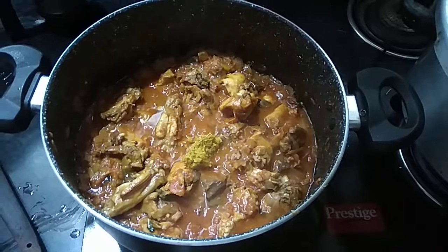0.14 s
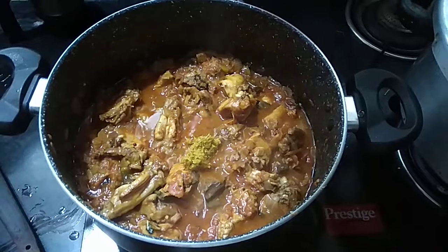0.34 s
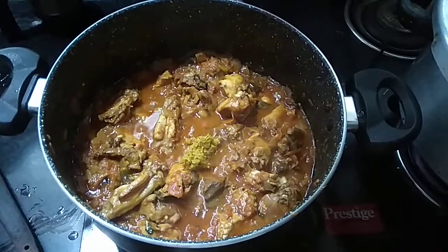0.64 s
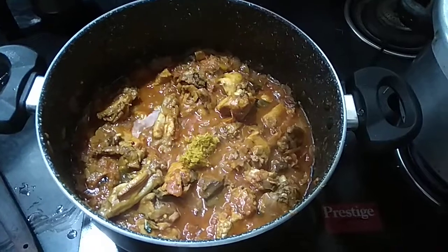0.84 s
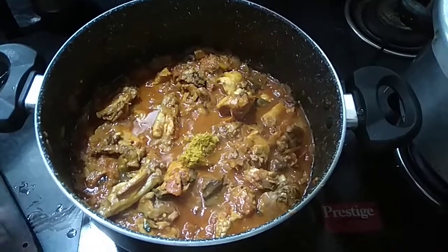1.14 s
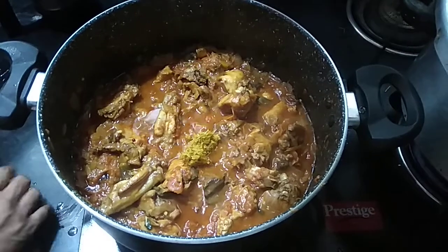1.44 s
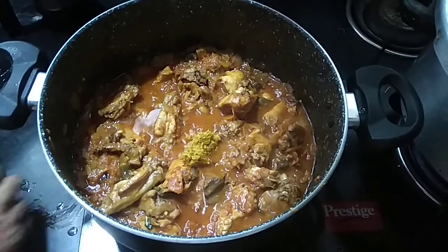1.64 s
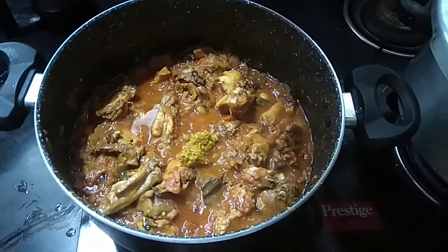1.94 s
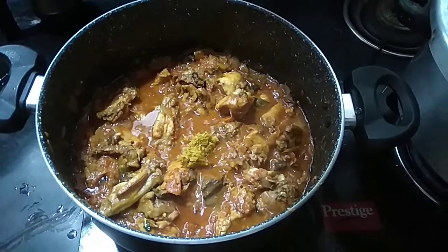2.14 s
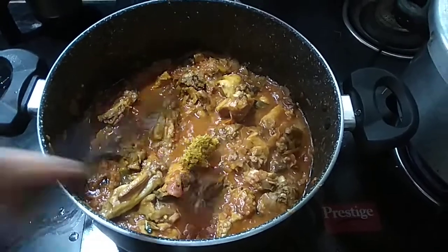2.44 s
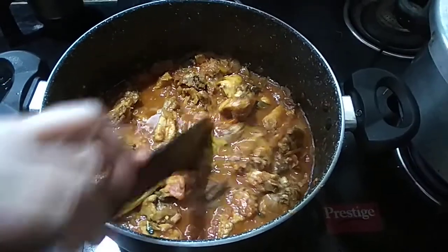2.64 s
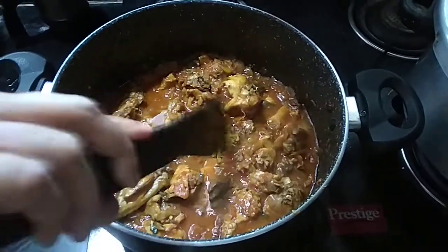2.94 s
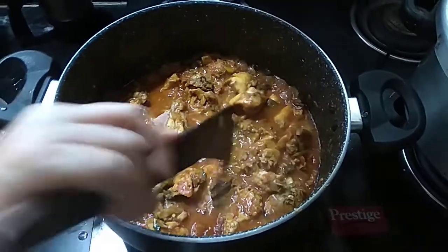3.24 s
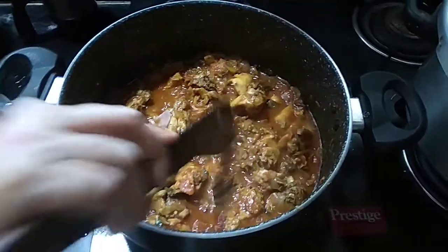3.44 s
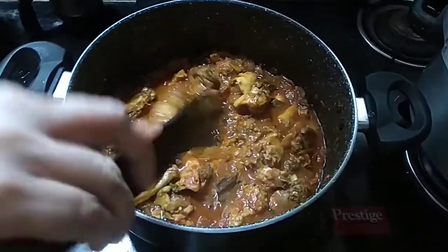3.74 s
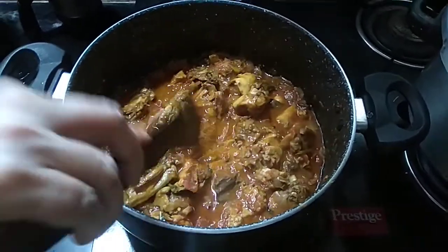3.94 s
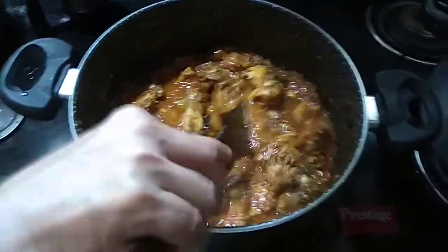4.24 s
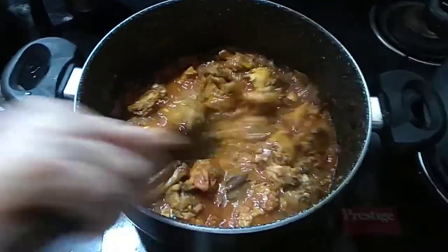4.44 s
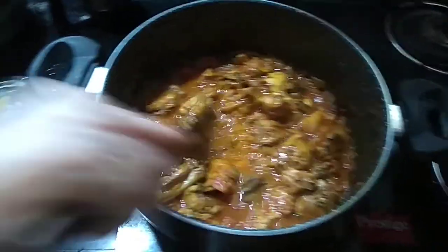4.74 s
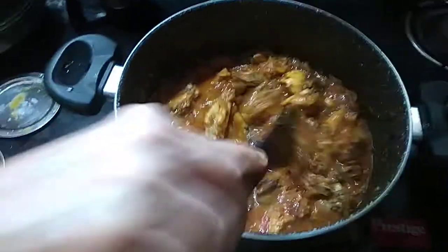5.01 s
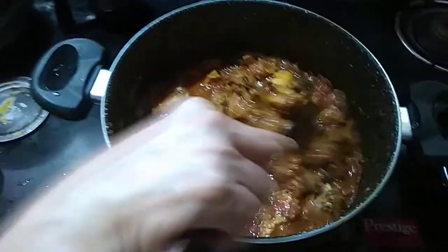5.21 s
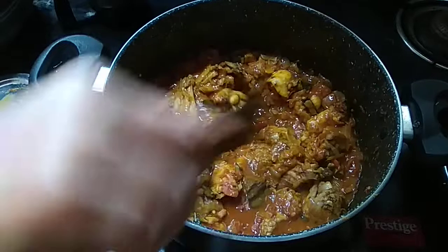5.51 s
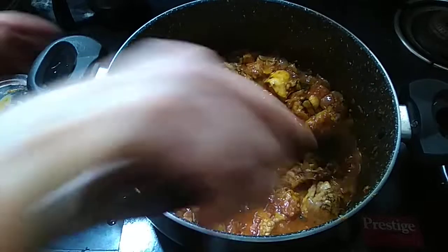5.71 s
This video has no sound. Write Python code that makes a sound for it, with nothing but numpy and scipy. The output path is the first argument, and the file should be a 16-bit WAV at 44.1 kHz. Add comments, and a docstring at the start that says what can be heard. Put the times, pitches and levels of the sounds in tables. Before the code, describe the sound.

A fine frying hiss with soft bubble plops, scattered knocks and clinks, then spoon strokes, bright metallic scrapes and a short pot groan.

```python
"""Frying hisses and pops while utensils and a metal pot of thick curry knock about on a glass hob in a kitchen.
Slow bubbles plop, the shifting pot groans, steam spits, and a spoon squelches and squeals; air puffs past.
Grains of noise make the sizzle and squelch; brief blows through resonances make the dull knocks and hard taps.
Friction drives the modes of groan and squeal, sines carry plops and whine, filtered noise the spits and pops.
A diffuse tail, decaying at its own pace in each octave, places most of them in the room."""
import sys
import numpy as np
from scipy import signal
from scipy.fft import rfft, irfft
from scipy.io import wavfile

SR = 44100
rng = np.random.default_rng(int(sys.argv[2]) if len(sys.argv) > 2 else 0)


def inscribe(sig):
    """Save sig as 16-bit PCM at rate SR to the path in sys.argv[1].

    A 1-D sig is mono; a 2-D sig holds one channel per row.
    Samples are clipped to [-1, 1] before scaling.
    """
    pcm = np.round(np.clip(np.atleast_2d(sig).T, -1, 1) * 32767)
    wavfile.write(sys.argv[1], SR, pcm.astype(np.int16))


N = 258867
TIME = np.arange(N) / SR
EVENT_TIME = TIME[:SR * 2 // 5]   # the 0.4 s given to one event

# strokes of the spoon through the gravy: start_s, rub_db, length_s, whine_hz, slosh_db
STROKES = [(2.673, -66, 0.11, 1964, -91), (3.56, -64, 0.1, 1882, -83.5), (3.855, -70, 0.043, 1960, -88),
           (4.062, -68, 0.1, 1900, -94), (4.154, -63, 0.11, 1870, -82), (4.242, -74, 0.098, 1893, -71.5),
           (4.39, -68.5, 0.14, 1842, -87.5), (4.495, -66.5, 0.11, 2320, -85),
           (4.601, -61, 0.12, 1760, -64.5), (5.063, -59.5, 0.023, 1695, -63.5),
           (5.182, -56.5, 0.037, 2014, -61), (5.349, -59.5, 0.023, 1974, -72),
           (5.73, -67.5, 0.18, 2220, -71)]
STROKE_RISE_S = 0.015
# pot shifting on the glass: start_s, level_db, length_s, favoured_hz
DRAGS = [(0.482, -62.5, 0.083, 1390), (5.632, -47.5, 0.039, 605), (5.712, -55, 0.053, 680),
         (5.765, -38.5, 0.016, 360), (5.765, -52, 0.073, 1120), (5.806, -43.5, 0.033, 590)]


def from_db(db):
    """Decibels to amplitude ratio: 20 dB per factor of ten."""
    return 10 ** (np.asarray(db) / 20)


def rms_one(x):
    """Normalise to unit mean power."""
    return x / np.sqrt(np.mean(x ** 2) + 1e-20)


def at_hz(points, hz):
    """Interpolate a table linearly along a logarithmic frequency axis."""
    freqs, values = np.transpose(points)
    return np.interp(np.log(hz + 1e-9), np.log(freqs), values)


def coloured(x, spectrum):
    """Spectral shaping: weight each frequency of a steady sound by a table; unit power."""
    gain = from_db(at_hz(spectrum, np.fft.rfftfreq(N, 1 / SR)))
    return rms_one(irfft(rfft(x) * gain, N))


def band(x, low_hz, high_hz, order=2):
    """Causal Butterworth band-pass."""
    top = min(max(high_hz, low_hz * 1.1), SR * .45)
    sos = signal.butter(order, [low_hz, top], "band", fs=SR, output="sos")
    return signal.sosfilt(sos, x + 1e-18)


def resonate(x, modes):
    """Modal synthesis: parallel two-pole resonances (hz, width_hz, peak_db) of alternating sign."""
    out = 0
    for k, (hz, width, db) in enumerate(modes):
        radius = np.exp(-np.pi * width / SR)
        poles = [1, -2 * radius * np.cos(2 * np.pi * hz / SR), radius * radius]
        gain = (-1) ** k * from_db(db) * (1 - radius * radius) / 2
        out = out + gain * signal.lfilter([1, 0, -1], poles, x + 1e-18)
    return out


def panned(x, pan_db):
    """Level difference between the channels: lean a sound to the left by pan_db."""
    return x * from_db(np.array([[pan_db], [-pan_db]]) / 2)


def add(track, start_s, x, db, length):
    """Energy scaling: mix in a sound with the energy of `length` seconds at level db."""
    start = max(round(start_s * SR), 0)
    energy = np.mean(np.sum(x ** 2, axis=-1))
    gain = from_db(db) * np.sqrt(length * SR / energy)
    track[..., start:start + x.shape[-1]] += gain * x[..., :N - start]


def ports(likeness):
    """Partial coherence: a short run of noise that the two microphones share in part."""
    shared = rng.standard_normal(len(EVENT_TIME))
    own = rng.standard_normal((2, len(EVENT_TIME)))
    share = np.clip(likeness, 0, 1)
    return np.sqrt(share) * shared + np.sqrt(1 - share) * own


def stroke(length, rise, fall):
    """Exponential envelope of a push that builds, holds and lets go."""
    return (1 - np.exp(-EVENT_TIME / rise)) * np.exp(-np.maximum(EVENT_TIME - length, 0) / fall)


def pushes(rows, rise, fall):
    """Superposed envelopes from rows of start_s, level_db, length_s."""
    gain = np.zeros(N + len(EVENT_TIME))
    for start_s, db, length in rows:
        start = round(start_s * SR)
        gain[start:start + len(EVENT_TIME)] += from_db(db) * stroke(length, rise, fall)
    return gain[:N]


def waver(rate_hz):
    """Low-passed noise: a random wandering with unit spread."""
    low_pass = signal.butter(2, rate_hz, fs=SR, output="sos")
    settled = signal.sosfilt(low_pass, rng.standard_normal(N + SR))[SR:]
    return rms_one(settled)


def grains(per_s, spread_db, low_hz, high_hz, cycles, scatter_db, count=16):
    """Shot noise: bursts of random time, size and side, ringing a few cycles at `count` pitches; unit power."""
    out = np.zeros((2, N))
    for hz in np.geomspace(low_hz, high_hz, count):
        at = np.flatnonzero(rng.random(N) < per_s / count / SR)
        size = from_db(spread_db * np.minimum(rng.exponential(1, len(at)), 2.7))
        size = size * rng.choice([-1, 1], len(at))
        side_db = scatter_db * rng.standard_normal(len(at)) / 2
        lead = rng.integers(0, 9, len(at))   # samples by which the right is early
        clicks = np.zeros((2, N))
        clicks[0, at] = size * from_db(side_db)
        clicks[1, (at - lead) % N] = size * from_db(-side_db)
        out += resonate(clicks, [(hz, hz / cycles, 0)]) / np.sqrt(hz)
    return rms_one(out)


def kitchen(x, wet_db, build_s=0.00024):
    """Reverberation: direct sound plus a diffuse tail that dies at its own pace in each octave."""
    # decay time of the room: frequency_hz, t60_s
    decay = [(80, 0.82), (250, 0.23), (600, 0.29), (1000, 0.33), (1500, 0.36), (4000, 0.37), (12000, 0.26)]
    tail, edges = 0, np.geomspace(45, 18000, 10)
    for low, high in zip(edges, edges[1:]):
        # the two sides grow less alike as pitch rises
        noise = band(ports(likeness=1 / (1 + (low / 600) ** 2)), low, high)
        t60_s = at_hz(decay, np.sqrt(low * high))
        tail = tail + noise * from_db(-60 * EVENT_TIME / t60_s)
    tail = tail * (1 - np.exp(-EVENT_TIME / build_s))
    tail = tail / np.sqrt(np.sum(tail ** 2) / 2)
    return x + from_db(wet_db) * signal.fftconvolve(x, tail, axes=-1)[:, :N]


def friction(rows, modes, octaves, grit_db, likeness, rise, fall, skirt_hz, judder_db):
    """Stick-slip: an uneven force feeds a body's modes, most of all those near the favoured pitch."""
    out = np.zeros((2, N))
    for start_s, db, length, hz in rows:
        unevenness = rms_one(band(rng.standard_normal(len(EVENT_TIME)), 100, 500))
        force = ports(likeness) * from_db(judder_db * unevenness) * stroke(length, rise, fall)
        ringing = 0
        for mode_hz, width, gain_db in modes:
            fed_db = gain_db - 10 * np.log10(1 + (np.log2(mode_hz / hz) / octaves) ** 2)
            narrow = resonate(force, [(mode_hz, width, fed_db)])
            # a second, wider pass keeps the valleys between the modes dark
            ringing = ringing + resonate(narrow, [(mode_hz, skirt_hz, 0)])
        grit = band(force, hz / 2 ** (1 / 4), hz * 2 ** (1 / 4), order=4)
        add(out, start_s, ringing + from_db(grit_db) * grit, db, length)
    return out


def sizzle(flare_db=3.0, flare_per_s=26, steady_db=-50):
    """Dense shot noise: tiny bubbles burst in hot fat, in flurries, more where metal is bared or the pot jolted."""
    # spectrum of the frying: frequency_hz, relative_db_per_hz
    colour = [(1500, -53.5), (2500, -43), (3400, -21.5), (4500, -11.5), (6200, -4), (8000, -0.5), (9700, 5),
              (12000, 2), (15000, -4), (16200, -8.5)]
    crackle = grains(per_s=3600, spread_db=4.5, low_hz=3000, high_hz=16000, cycles=4.0, scatter_db=4.0)
    flurries = from_db(flare_db * waver(flare_per_s))
    crackle = coloured(kitchen(crackle * flurries, wet_db=-1.5), colour)
    # the spoon bares hot metal; a jolt of the pot runs fat over it
    bared = pushes([row[:3] for row in STROKES], STROKE_RISE_S, fall=0.0097)
    jolted = pushes([(start_s, 0, length) for start_s, _, length, _ in DRAGS], STROKE_RISE_S, fall=0.019)
    vigour = 1 + from_db(-10.5) * bared / bared.max() + from_db(-17) * jolted / jolted.max()
    return panned(crackle * from_db(steady_db) * vigour, pan_db=2.5)


def background(air_db=-75.5):
    """Broadband room air, and low-frequency turbulence from the sweeping arm, mostly at the nearer microphone."""
    # spectrum of the air: frequency_hz, relative_db_per_hz
    air_colour = [(15, -22), (25, 7), (152, -8), (494, -11.5), (695, -16.5), (1190, -9.5), (1580, -17),
                  (3000, -12), (3900, -47.5), (6600, -120)]
    # puffs from the arm: start_s, level_db, length_s
    puffs = [(2.59, -80, 0.056), (2.83, -79.5, 0.027), (4.27, -70, 0.032), (4.96, -58.5, 0.065),
             (5.045, -41.5, 0.015), (5.09, -61, 0.092), (5.22, -58.5, 0.093), (5.73, -74.5, 0.21)]
    air = from_db(air_db) * coloured(rng.standard_normal((2, N)), air_colour)
    turbulence = rng.standard_normal(N) + 0.44 * rng.standard_normal((2, N))
    draught = rms_one(band(turbulence, 52, 112.5))
    return air + panned(draught * pushes(puffs, rise=0.0058, fall=0.023), pan_db=20.0)


def knocks(chatter_s=0.0075, first_db=24, broad_db=-8.0, softness_hz=2400, boom_decay_s=0.2, boom_hold_s=0.22):
    """Impact excitation: a blow and its chatter give dull knocks of the loaded pot and of things set down nearby,
    and the hob booms with beats."""
    # dull knocks and rebounds: start_s, level_db, low_hz, high_hz, ringing_db, hob_boom_db, left_right_db
    blows = [(0.001, -47.5, 202, 614, -18, -22.5, 5.5), (0.004, -45.5, 1060, 1740, -6, -34, 6),
             (1.032, -50, 451, 930, -11, -38, 6), (1.043, -43.5, 640, 1130, -7, -36, 7),
             (1.071, -47.5, 800, 1015, -16, -37, 8), (1.422, -42.5, 487, 722, -15, -31.5, 9.5),
             (1.445, -47.5, 560, 740, -15.5, -30, 7), (1.842, -33, 368, 644, -3, -39.5, 7),
             (1.842, -36, 205, 367, -9, -1.5, 3.5), (1.852, -45, 615, 1490, -20, -34, 7),
             (3.033, -31, 447, 710, -4.5, -23.5, 6.5), (3.035, -44, 240, 376, -13, -30, 6),
             (3.042, -36, 523, 1520, -2, -34, 9), (3.053, -40, 518, 1800, 0, -34, 4),
             (3.094, -43, 520, 1195, -4.5, -34, 8), (4.644, -36, 317, 647, -5, -16.5, 9.5),
             (4.656, -40.5, 496, 1210, 0, -46, 4), (4.664, -43.5, 450, 1300, 0, -34, 8),
             (4.702, -48.5, 450, 1050, -3.5, -34, 3), (5.221, -49, 290, 690, -7.5, -16, 9),
             (5.238, -45, 532, 758, -2.5, -17, 4.5)]
    # resonances of the knocks, those of the loaded pot: frequency_hz, width_hz, gain_db
    pot = [(234, 160, 0), (323.7, 4.9, 9), (506, 160, -4.5), (553, 12, 8.5), (985, 22, 1), (1346, 30, -12),
           (1960, 33, -7.5)]
    # boom of the hob, whose close pair makes it swell and throb: frequency_hz, gain_db
    hob_modes = [(83, 1), (89.2, -2.5), (124, -8.5)]
    out, hob = np.zeros((2, 2, N))
    cushion = signal.butter(4, softness_hz, fs=SR, output="sos")
    boom = 0
    for k, (hz, db) in enumerate(hob_modes):
        boom = boom + (-1) ** k * from_db(db) * np.sin(2 * np.pi * hz * EVENT_TIME)
    boom = boom * np.exp(-EVENT_TIME / boom_decay_s) * stroke(boom_hold_s, rise=0.011, fall=0.015)
    first = from_db(first_db) * signal.unit_impulse(len(EVENT_TIME))
    for start_s, db, low_hz, high_hz, ring_db, boom_db, pan_db in blows:
        chatter = ports(likeness=0.57) * np.exp(-EVENT_TIME / chatter_s)
        blow = signal.sosfilt(cushion, first + chatter)
        body = from_db(ring_db) * resonate(blow, pot) + from_db(broad_db) * blow
        thud = band(body, low_hz, high_hz, order=3)
        add(out, start_s, panned(thud, pan_db), db, length=0.015)
        add(hob, start_s, panned(boom, pan_db=9.5), db + boom_db, length=0.02)
    return kitchen(out, wet_db=0.5, build_s=0.0036) + hob


def taps(broad_db=-4.0):
    """Impact excitation: hard, short contacts ring the modes of a utensil."""
    # hard taps: start_s, level_db, low_hz, high_hz, chatter_s
    contacts = [(0.002, -61, 2410, 3300, 0.0098), (1.041, -34, 3220, 15200, 0.0073),
                (1.048, -53, 1880, 2600, 0.015), (1.419, -39, 4000, 10800, 0.0095),
                (1.424, -46.5, 2340, 11400, 0.0088), (1.436, -52.5, 1844, 2240, 0.01),
                (1.648, -57.5, 1830, 2480, 0.015), (1.849, -34.5, 2000, 3120, 0.016),
                (1.848, -35.5, 3450, 12100, 0.0082), (3.423, -56.5, 1160, 3020, 0.0052),
                (3.58, -41, 8600, 13700, 0.006), (4.9, -49, 2660, 11200, 0.003),
                (5.147, -53, 4310, 5640, 0.0015), (5.204, -55, 1510, 6070, 0.004),
                (5.226, -52.5, 2400, 5500, 0.0036), (5.642, -57, 1515, 2560, 0.011)]
    # ringing of the utensil: frequency_hz, width_hz, gain_db
    utensil = [(1974, 31, -4), (2390, 230, 2), (2540, 64, -1), (2815, 100, 1), (4947, 37, 1.5),
               (6560, 57, 6), (9170, 48, -2), (9800, 91, 8.5)]
    out = np.zeros((2, N))
    for start_s, db, low_hz, high_hz, chatter_s in contacts:
        blow = ports(likeness=0.17) * np.exp(-EVENT_TIME / chatter_s)
        ringing = resonate(blow, utensil) + from_db(broad_db) * blow
        add(out, start_s, band(ringing, low_hz, high_hz, order=3), db, length=0.0061)
    return panned(kitchen(out, wet_db=0.0), pan_db=4.5)


def plops(swell_s=0.005, open_s=0.009, fall_s=0.008, wobble=0.049, smack_db=-15.0):
    """Damped bubble resonance: an unsteady tone and a soft wet smack, damped at once by the thick gravy."""
    # slow bubbles, some in gurgling runs: start_s, level_db, pitch_hz
    bubbles = [(0.168, -64, 370), (0.207, -65, 1235), (0.468, -57.5, 359), (0.486, -46.5, 348),
               (0.495, -59, 1165), (0.528, -54, 438), (0.551, -63, 346), (0.569, -68, 449),
               (0.579, -72, 616), (0.588, -66, 1216), (1.639, -62.5, 490), (1.675, -65.5, 508),
               (2.147, -64, 506), (2.21, -68.5, 1245), (2.345, -70, 653), (2.519, -69.5, 342),
               (2.584, -75.5, 1030), (2.627, -61, 539), (2.732, -73, 347), (2.843, -79, 586),
               (2.916, -66, 615), (2.922, -58.5, 1666), (4.18, -76, 510), (4.309, -71, 534),
               (4.343, -62.5, 1165)]
    out = np.zeros((2, N))
    for start_s, db, hz in bubbles:
        unsteady = rms_one(band(rng.standard_normal(len(EVENT_TIME)), 15, 120))
        pitch_hz = hz * (1 + wobble * unsteady)
        tone = np.sin(2 * np.pi * np.cumsum(pitch_hz) / SR)
        smack = rms_one(band(ports(likeness=0.8), hz * 0.6, hz * 1.25))
        plop = (tone + from_db(smack_db) * smack) * stroke(open_s, swell_s, fall_s)
        add(out, start_s, panned(plop, pan_db=10.0), db, length=0.025)
    return kitchen(out, wet_db=-5.5)


def groan():
    """Stick-slip friction: the pot's base judders over the glass and sounds its own modes."""
    # modes of the base: frequency_hz, width_hz, gain_db
    base = [(339, 15.6, 7.5), (545, 58, -8.5), (595, 16, -2.5), (1000.4, 8.1, -2), (1204, 160, -7.5),
            (1635, 26, -20), (2246, 71, -9.5), (2920, 42, -9.5)]
    judder = friction(DRAGS, base, octaves=.4, grit_db=-29.0, likeness=.7,
                      rise=.0015, fall=.012, skirt_hz=200, judder_db=1.5)
    return panned(kitchen(judder, wet_db=-12.0), pan_db=8.0)


def spits(width_hz=450, hiss_db=-26.5):
    """Jet noise: steam whistles for an instant through a pinhole in the sauce, as noise in a narrow resonance."""
    # spits of steam: start_s, level_db, length_s, pitch_hz
    jets = [(0.734, -39, 0.0082, 11820), (1.746, -48.5, 0.018, 11700), (2.906, -38, 0.015, 12230),
            (2.921, -32, 0.0083, 11200), (3.302, -38, 0.011, 11230), (3.314, -38.5, 0.0037, 11000),
            (4.351, -46.5, 0.011, 11800)]
    out = np.zeros((2, N))
    for start_s, db, length, hz in jets:
        jet = ports(likeness=0.58) * stroke(length, rise=0.0022, fall=0.0033)
        whistle = resonate(resonate(jet, [(hz, width_hz, 0)]), [(hz, 2 * width_hz, 0)])
        hiss = from_db(hiss_db) * band(jet, 8640, 11000)
        add(out, start_s, whistle + hiss, db, length)
    return panned(kitchen(out, wet_db=-8.5), pan_db=-9.0)


def pops(snap_s=0.00079, spread=1.07, trim_db=-5):
    """Transient burst: a larger bubble in the fat gives one dry snap of narrow-band noise, pitched by its size."""
    # sharp pops: start_s, relative_db (before the trim), pitch_hz, left_right_db
    bursts = [(0.7369, -28, 11300, -0.5), (1.8126, -37, 9550, 6), (2.3972, -33.5, 9520, 8),
              (3.1687, -46, 11200, 5.5), (3.3039, -38, 11400, -6.5), (3.582, -31, 11600, -3),
              (3.8234, -43, 11500, -4), (4.387, -29.5, 13600, 11.5), (4.89, -29.5, 11100, 2),
              (5.0626, -37.5, 9830, 8), (5.1457, -31, 11600, 1.5), (5.1925, -34, 9400, 2.0)]
    out = np.zeros((2, N))
    for start_s, db, hz, pan_db in bursts:
        noise = ports(likeness=0.32) * np.exp(-EVENT_TIME / snap_s)
        snap = band(noise, hz / spread, hz * spread)
        add(out, start_s, panned(snap, pan_db), db + trim_db, length=0.0014)
    return kitchen(out, wet_db=-2.0)


def squelch(whine_db=-5.0, wander=0.016, fall_s=0.0065):
    """Granular friction with a wavering whine, and cavity resonance of air pockets opening behind the spoon."""
    # resonances of spoon and pot under the rubbing: frequency_hz, width_hz, gain_db
    rub_modes = [(1228, 75, -12), (1900, 25, -5.5), (2444, 110, 1), (2890, 270, 3), (3800, 920, -1),
                 (5760, 480, -6)]
    # hollows that open in the gravy: frequency_hz, width_hz, gain_db
    hollows = [(331, 55, -10.5), (535, 75, -7), (1000, 67, -1), (1220, 78, 4)]
    start_s, rub_db, length, whine_hz, slosh_db = np.transpose(STROKES)
    # the spoon rubs through spice and meat
    grit = grains(per_s=700, spread_db=4.5, low_hz=1400, high_hz=5500, cycles=3, scatter_db=8, count=8)
    pockets = grains(per_s=730, spread_db=6.0, low_hz=353, high_hz=1286, cycles=14.0, scatter_db=9.0, count=8)
    latest = np.maximum(np.searchsorted(start_s, TIME) - 1, 0)
    pitch_hz = whine_hz[latest] * (1 + wander * waver(24))
    whine = waver(40) * np.sin(2 * np.pi * np.cumsum(pitch_hz) / SR)
    rub = rms_one(resonate(grit, rub_modes)) + from_db(whine_db) * rms_one(whine)
    rub = rub * pushes(zip(start_s, rub_db, length), STROKE_RISE_S, fall_s)
    slosh = rms_one(resonate(pockets, hollows))
    slosh = slosh * pushes(zip(start_s, slosh_db, length), STROKE_RISE_S, fall_s)
    return panned(kitchen(rub + slosh, wet_db=-2.0), pan_db=6.0)


def squeal(ring_octaves=0.07, uneven_db=2.5, wander_hz=14, flutter_db=1.5, width_hz=58):
    """Stick-slip and modal ringing: the spoon's edge scrapes bare metal, whose modes waver under it."""
    # skips of the edge: start_s, scrape_db, length_s, scrape_hz, ringing_db, ringing_decay_s, ringing_hz
    slips = [(4.405, -35.5, 0.0084, 13560, -34, 0.02, 13400),
             (4.409, -44.5, 0.042, 9200, -31, 0.044, 10350), (4.454, -32.5, 0.027, 10250, -32, 0.04, 13400),
             (4.456, -52, 0.023, 8800, -45.5, 0.021, 5927), (4.508, -32, 0.011, 10900, -22.5, 0.022, 10820),
             (4.509, -46, 0.018, 13200, -30, 0.035, 12900), (4.511, -58, 0.017, 4400, -36, 0.036, 8200),
             (4.570, -36, 0.0036, 13400, -26, 0.0073, 13500),
             (4.5705, -33, 0.0059, 9200, -26.5, 0.0051, 11000),
             (4.592, -23, 0.009, 11800, -25.5, 0.041, 11800), (4.594, -52, 0.0256, 7000, -37, 0.058, 14750),
             (4.593, -51, 0.008, 5200, -50, 0.028, 5200), (4.891, -42, 0.029, 10340, -42, 0.03, 13700),
             (4.947, -41, 0.0063, 12500, -57, 0.027, 13500)]
    # ringing of the metal: frequency_hz, relative_db
    metal = [(3945, -58), (5200, -58), (5927, -54), (7075, -59), (8220, -46), (9216, -60), (9453, -54),
             (9631, -55), (9890, -56), (10180, -51), (10318, -53), (10454, -45), (10809, -51), (10844, -44),
             (10975, -56), (12005, -44), (12150, -52), (13006, -51), (13426, -50), (13598, -49),
             (14018, -62), (14298, -66), (14750, -53)]
    hz, mode_db = np.transpose(metal)
    # the scrape feels the modes with their level differences narrowed
    modes = list(zip(hz, np.full(len(hz), width_hz), 0.79 * (mode_db - mode_db.max())))
    skid = friction([row[:4] for row in slips], modes, octaves=.14, grit_db=-27.0, likeness=.3,
                    rise=.0004, fall=.002, skirt_hz=900, judder_db=6)
    ringing = np.zeros((2, N))
    for start_s, _, _, _, db, decay_s, ring_hz in slips:
        uneven = uneven_db * rng.standard_normal((2, len(hz)))
        nearness = 1 / (1 + (np.log2(hz / ring_hz) / ring_octaves) ** 2)
        fed = from_db(mode_db + uneven) * nearness
        pressure = rms_one(band(rng.standard_normal((len(hz), len(EVENT_TIME))), 30, 220))
        # pressure bends both pitch and level of each mode
        turns = np.cumsum(hz[:, None] + wander_hz * pressure, axis=1) / SR + rng.random((len(hz), 1))
        swings = from_db(flutter_db * pressure) * np.sin(2 * np.pi * turns)
        ring = fed @ swings * stroke(0, rise=0.00084, fall=decay_s)
        add(ringing, start_s, ring, db, length=0.0081)
    return panned(kitchen(skid, wet_db=-4.0) + kitchen(ringing, wet_db=-13.0), pan_db=10.0)


def off_centre(x, lag_s=0.00011):
    """Arrival-time difference: sound from the stove reaches the left microphone later."""
    return np.stack([np.roll(x[0], round(lag_s * SR)), x[1]])


def scene():
    """Superposition of everything at the stove."""
    steady = sizzle() + background()
    handling = off_centre(knocks() + taps() + groan() + spits() + squelch() + squeal())
    return steady + handling + plops() + pops()


def record(dry, cutoff_hz=15950):
    """Low-pass filtering: an elliptic filter cuts the top steeply."""
    low_pass = signal.ellip(10, .1, 80, cutoff_hz, fs=SR, output="sos")
    return signal.sosfilt(low_pass, dry)


dry = scene()
out = record(dry)
inscribe(out)
```